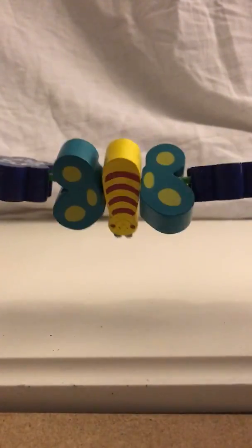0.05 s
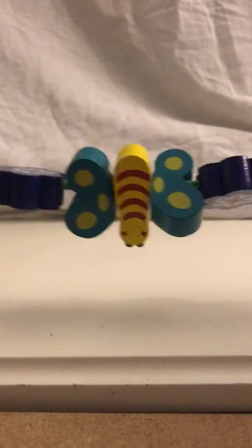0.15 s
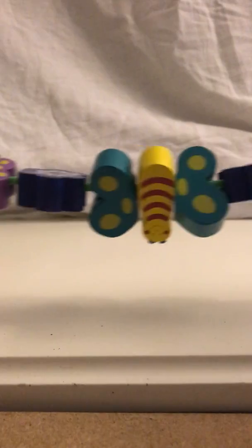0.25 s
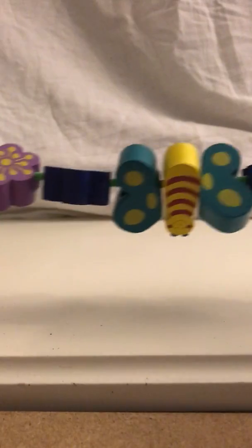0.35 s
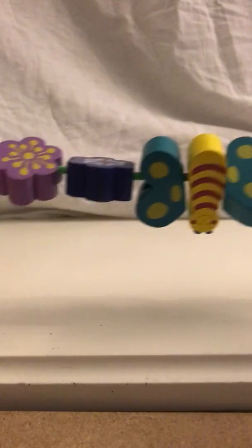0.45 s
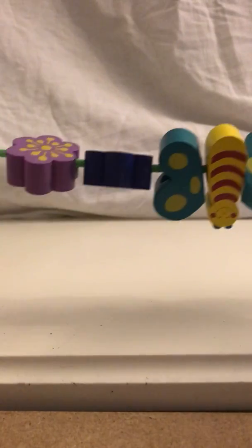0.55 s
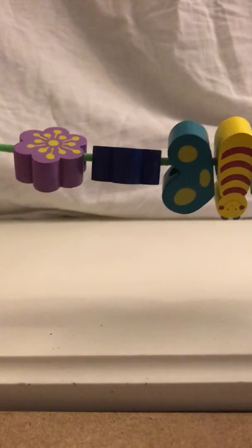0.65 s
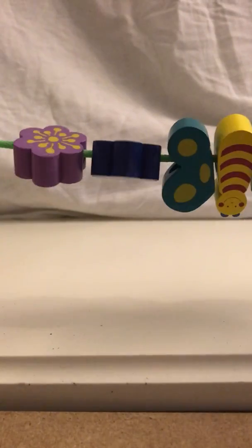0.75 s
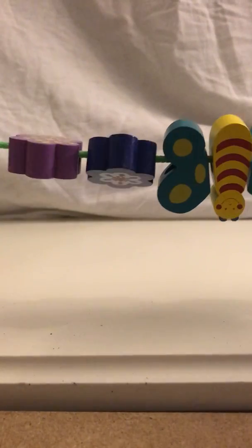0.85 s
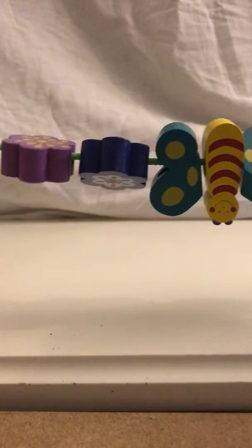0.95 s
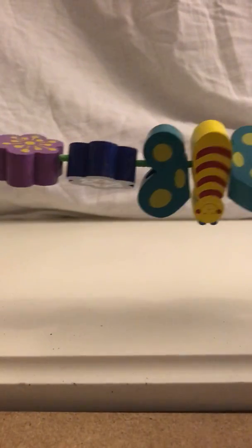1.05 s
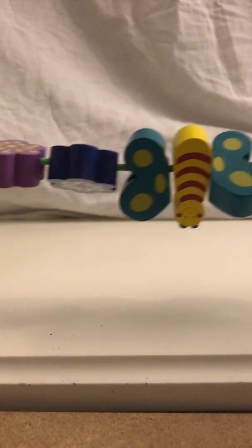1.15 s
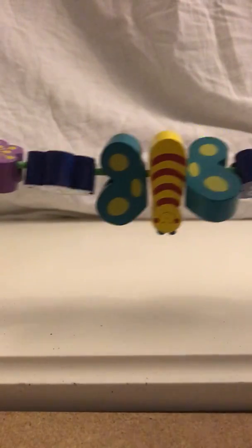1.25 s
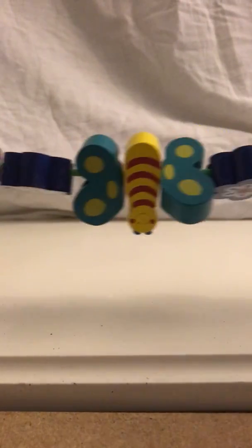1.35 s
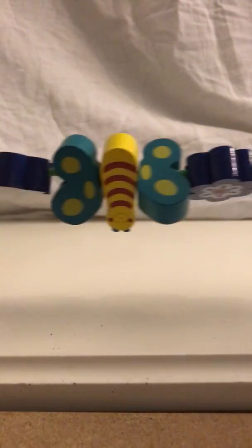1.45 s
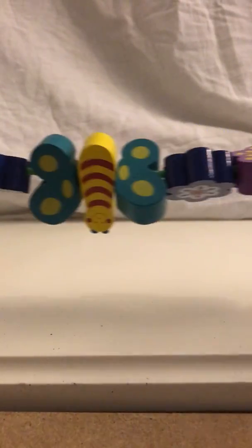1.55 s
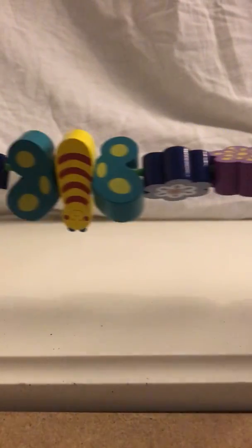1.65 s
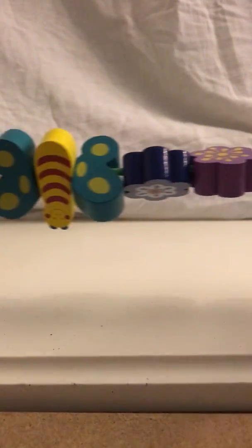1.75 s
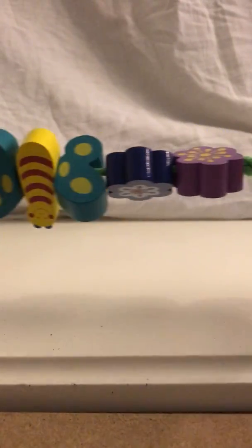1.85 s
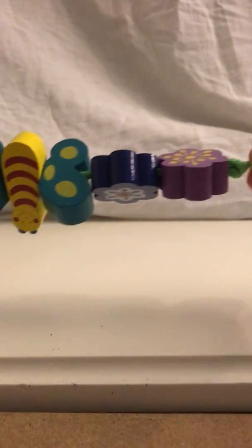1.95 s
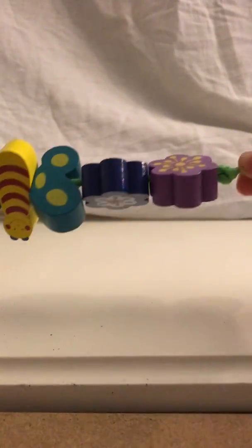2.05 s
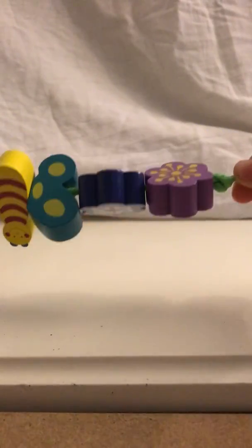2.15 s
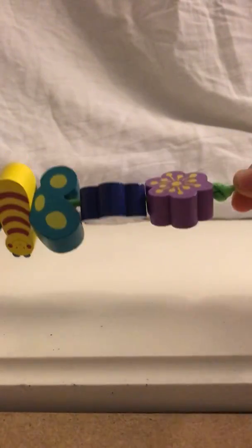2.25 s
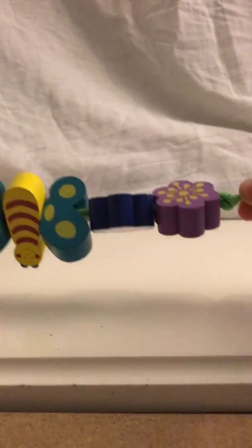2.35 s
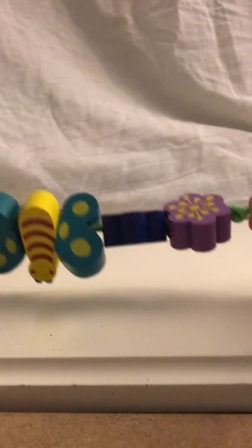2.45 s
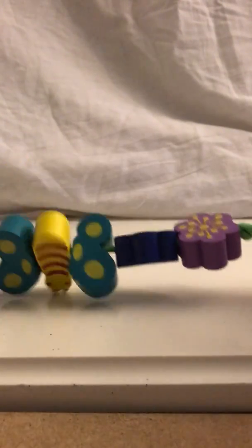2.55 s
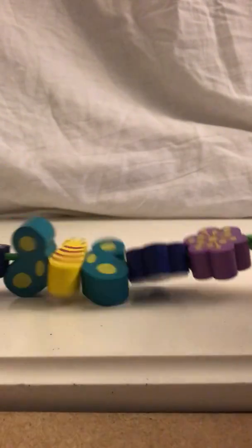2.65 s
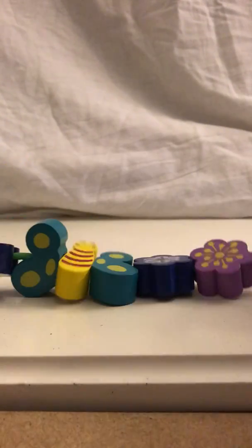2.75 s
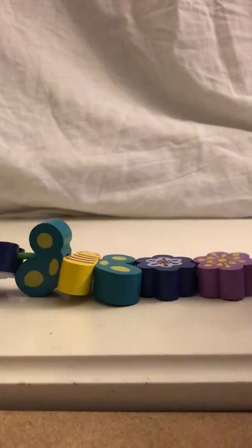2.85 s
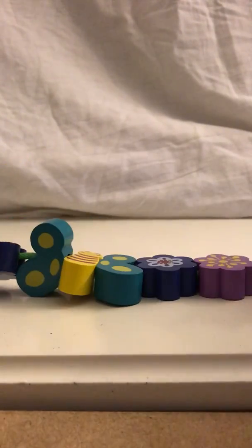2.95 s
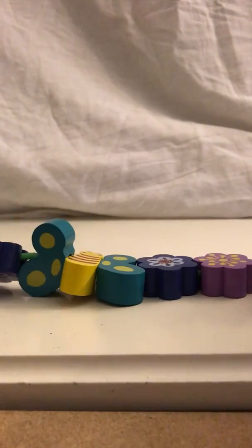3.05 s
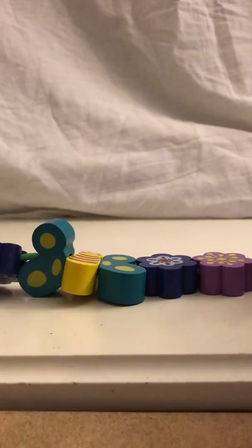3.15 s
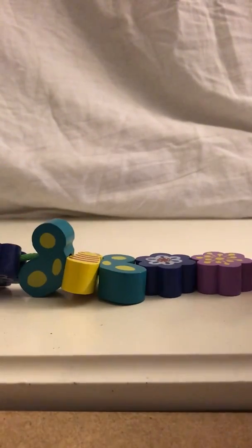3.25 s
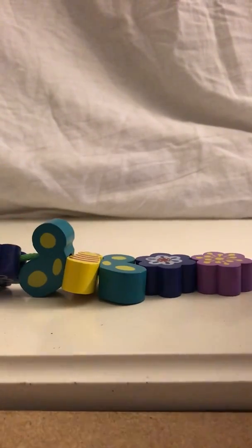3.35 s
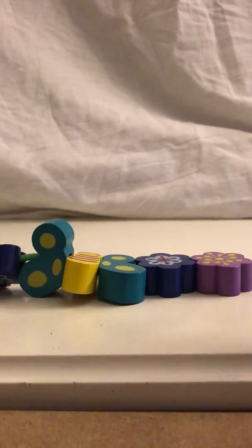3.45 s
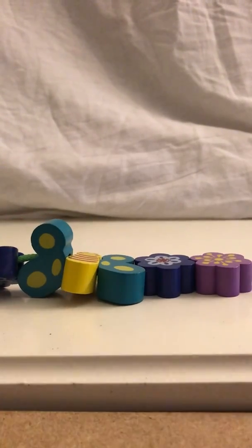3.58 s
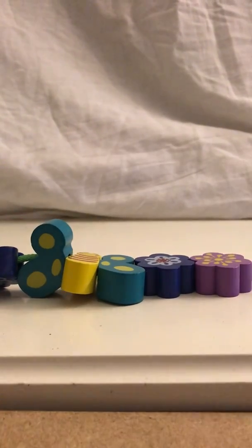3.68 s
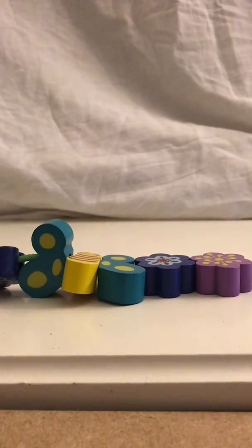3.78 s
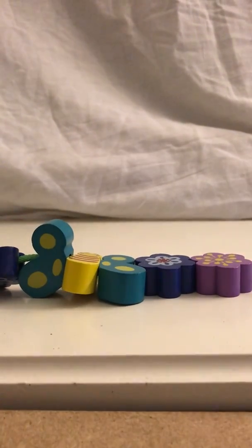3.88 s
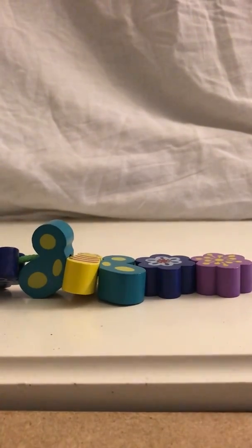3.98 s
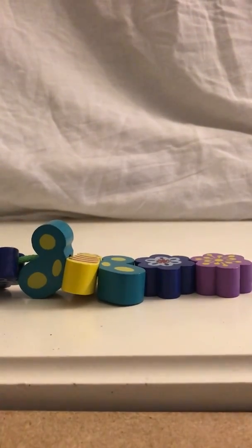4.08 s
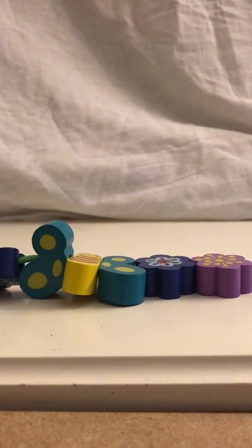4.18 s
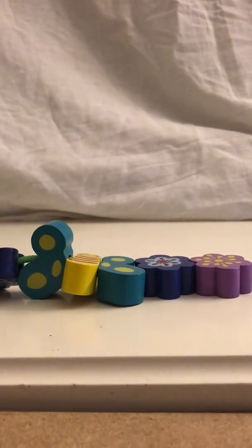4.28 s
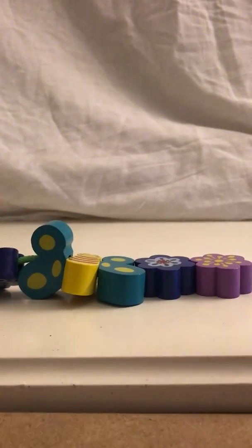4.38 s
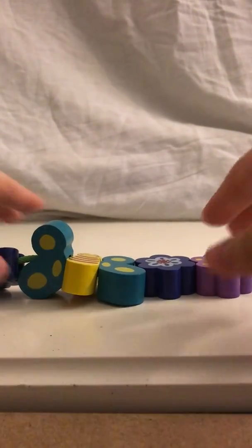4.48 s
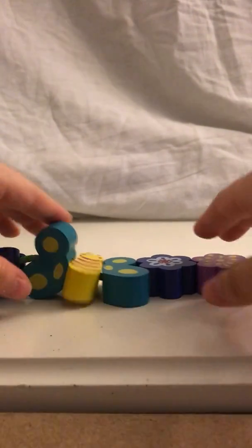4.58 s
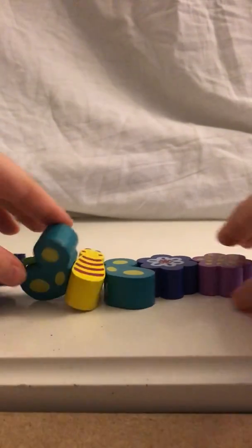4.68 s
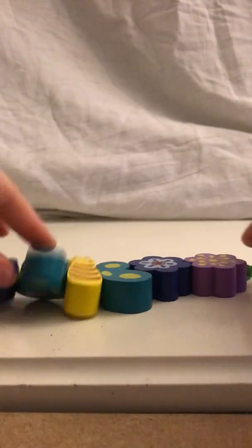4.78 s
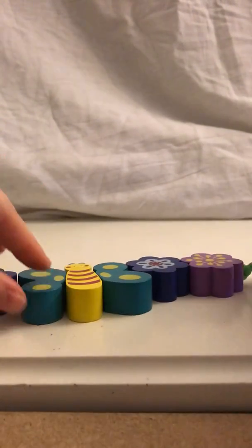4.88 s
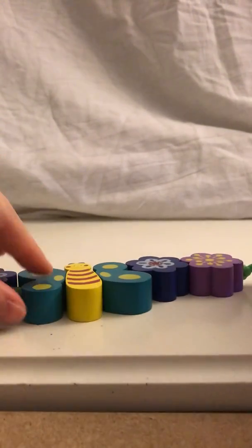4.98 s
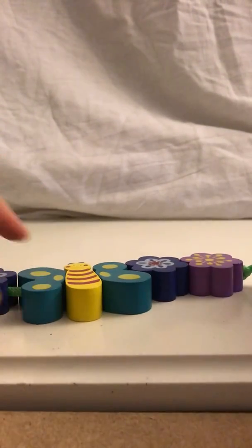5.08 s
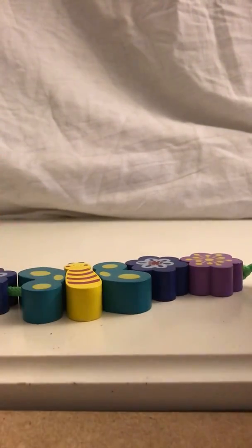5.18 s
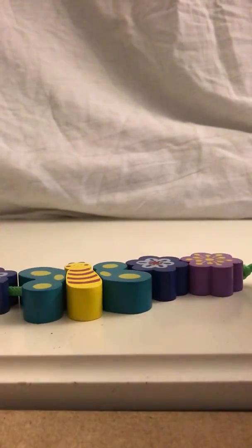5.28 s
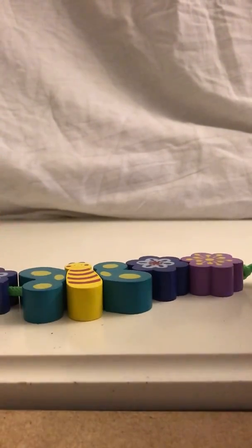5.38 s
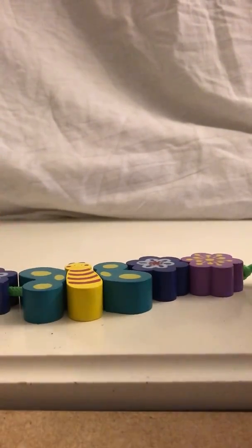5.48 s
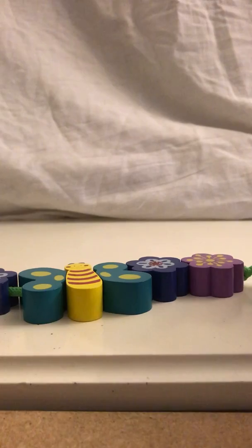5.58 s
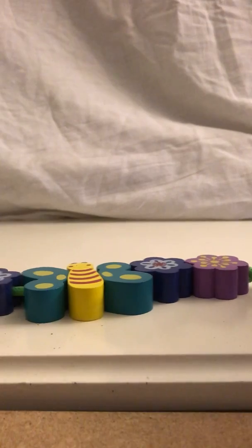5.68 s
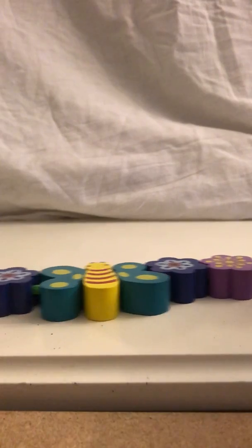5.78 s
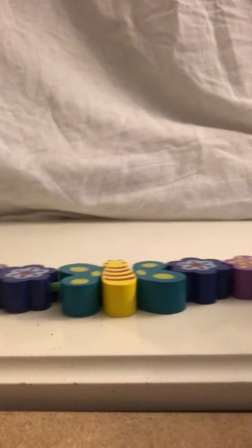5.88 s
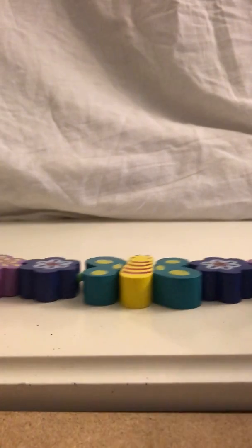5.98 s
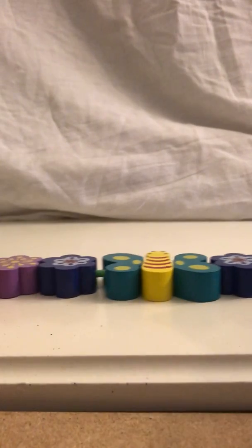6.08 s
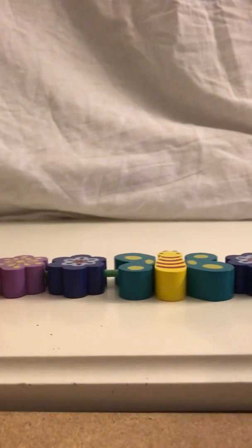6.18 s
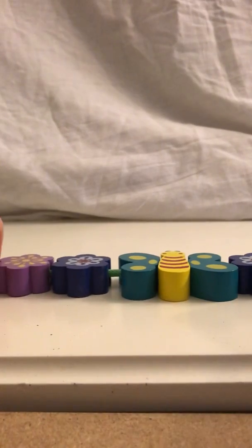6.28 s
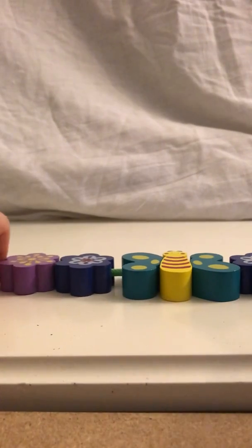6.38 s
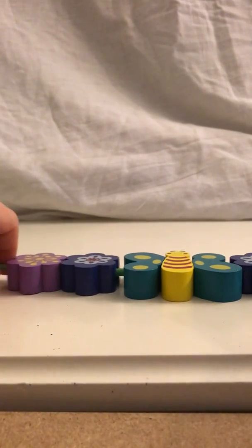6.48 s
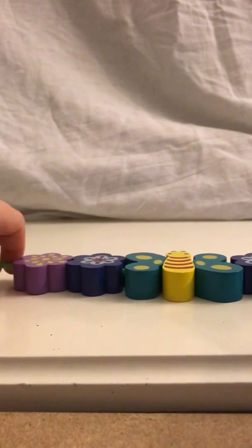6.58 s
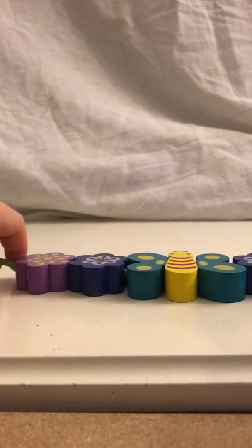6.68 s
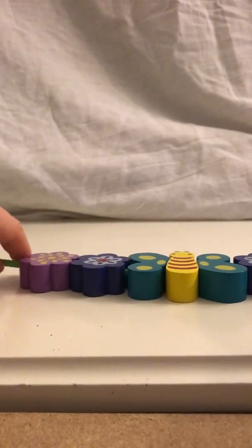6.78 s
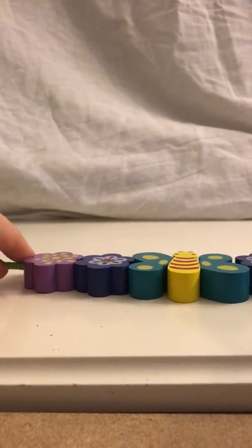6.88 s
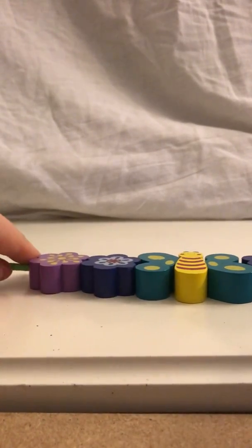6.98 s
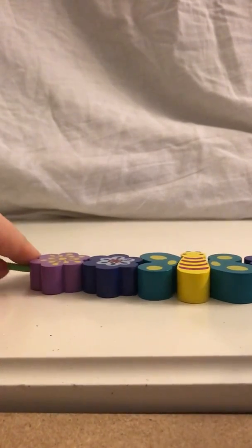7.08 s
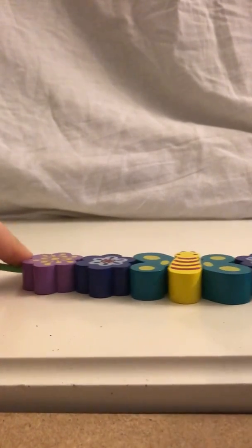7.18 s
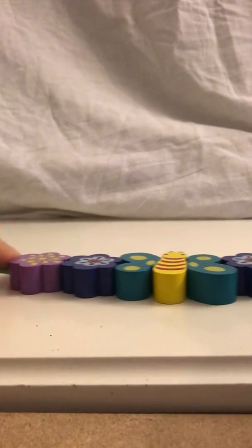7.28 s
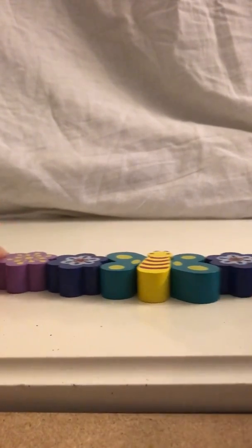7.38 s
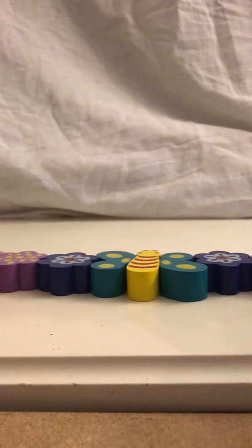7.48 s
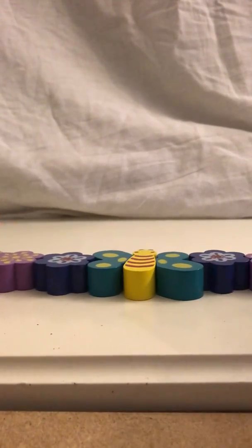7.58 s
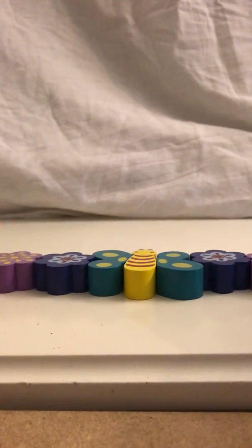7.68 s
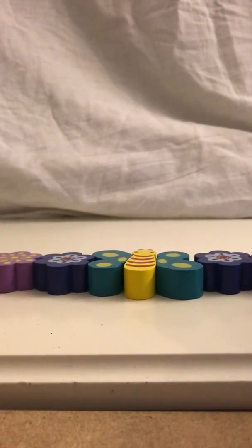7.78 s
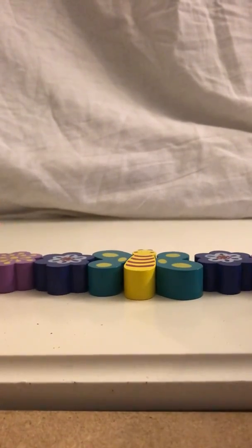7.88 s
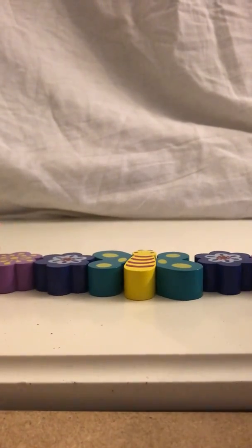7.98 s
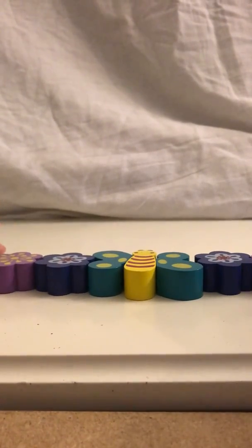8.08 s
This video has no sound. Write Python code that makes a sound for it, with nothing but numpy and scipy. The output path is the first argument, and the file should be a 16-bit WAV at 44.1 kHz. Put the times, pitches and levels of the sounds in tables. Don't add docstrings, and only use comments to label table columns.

```python
import sys
import numpy as np
from scipy import signal
from scipy.fft import rfft, irfft, next_fast_len
from scipy.io import wavfile
from scipy.ndimage import uniform_filter1d, map_coordinates

SR = 44100
rng = np.random.default_rng(int(sys.argv[2]) if len(sys.argv) > 2 else 0)


def decibels_to_gain(level_db):
    exponent = np.asarray(level_db, float) / 20
    return 10 ** exponent


def transcribe(u):
    v = np.clip(np.atleast_2d(u).T, -1, 1)
    q = np.round(v * 32767).astype(np.int16)
    wavfile.write(sys.argv[1], SR, q)


N = 359018
TOP_HZ = 15850
T = np.arange(SR // 2) / SR


def unit(x):
    return x / np.sqrt(np.mean(x ** 2) + 1e-20)


def along(points, hz):
    f, value = np.transpose(points)
    return np.interp(np.log(hz + 1), np.log(f + 1), value)


def curves(rows, silent=None):
    s, *columns = np.transpose(rows)
    t = np.arange(N) / SR
    return [np.interp(t, s, column, silent, silent) for column in columns]


def wobble(rate):
    knots = rng.standard_normal(int(N * rate / SR) + 4)
    return map_coordinates(knots, [np.arange(N) * rate / SR])


def noise(spectrum, grit_db, rate):
    m = next_fast_len(N + 8192)
    hz = np.fft.rfftfreq(m, 1 / SR)
    gritty = rng.standard_normal(N) * decibels_to_gain(grit_db * wobble(rate))
    colour = decibels_to_gain(along(spectrum, hz)) * (hz < TOP_HZ)
    return unit(irfft(rfft(gritty, m) * colour, m)[:N])


def ring(modes, rise, pitch=1, scatter_db=1.0, detune=0.027):
    hz, db, t60 = np.transpose(modes)[:, :, None]
    strength, shift = rng.standard_normal((2, len(modes), 1))
    t = T[:round(1.5 * t60.max() * SR)]
    decay = decibels_to_gain(db + scatter_db * strength - 60 * t / t60)
    waves = decay * np.sin(2 * np.pi * hz * pitch * (1 + detune * shift) * t)
    x = waves.sum(0) * (1 - np.exp(-t / rise))
    x = np.pad(x, (0, len(T) - len(t)))
    return x / np.abs(x).max()


def crack(lo_hz, hi_hz, t60, order=2):
    band = signal.butter(order, [lo_hz, min(hi_hz, SR / 2.2)], "bandpass", fs=SR, output="sos")
    t = T[:SR // 10]
    push = .45 * rng.standard_normal(len(t)) * decibels_to_gain(-60 * t / t60)
    push[0] = np.sqrt(SR / (hi_hz - lo_hz)) / 2
    x = np.pad(signal.sosfilt(band, push), (0, len(T) - len(t)))
    return x / np.abs(x).max()


# (f/Hz, t60/s)
ROOM_T60 = [(200, 0.68), (1500, 0.33), (5000, 0.24), (12000, 0.17)]
# (f/Hz, level/dB)
ROOM_COLOUR = [(200, -5), (1500, 1), (7000, -0.5), (9000, -4.5), (16000, -6.5)]


def room(x, wet_db):
    hz, t, z = signal.stft(rng.standard_normal(len(T)), SR, nperseg=256)
    decay_db = along(ROOM_COLOUR, hz)[:, None] - 60 * t / along(ROOM_T60, hz)[:, None]
    z = z * (hz < TOP_HZ)[:, None] * decibels_to_gain(decay_db)
    tail = signal.istft(z, SR, nperseg=256)[1][:len(T)]
    tail = tail * (1 - np.exp(-T / .003))
    colour = np.sqrt(np.abs(uniform_filter1d(np.abs(rfft(x)) ** 2, size=1200)))
    return x + decibels_to_gain(wet_db) * irfft(rfft(tail / np.linalg.norm(tail)) * colour, len(T))


def add(track, s, x):
    track[round(s * SR):][:len(x)] += x


# (t/s, level/dB)
RUMBLE_LEVEL = [(0, -62), (.68, -64), (1.68, -61.5), (2.6, -60), (2.67, -41.5), (2.81, -55.5),
                (3.35, -48.5), (3.74, -52), (4.3, -56), (4.87, -55.5), (5.05, -57.5), (5.5, -56.5),
                (6.12, -54), (7.09, -57), (7.8, -53.5), (8.14, -62)]
# (f/Hz, level/dB per Hz)
RUMBLE_SPECTRUM = [(12, -47.5), (20, -18), (31, -3.5), (48, -1.5), (97, -5.5), (135, -4.5), (179, -11),
                   (218, -2.5), (255, -8), (340, -9.5), (471, -21.5), (513, -31), (600, -22.5),
                   (780, -54.5), (1320, -120)]
# (t/s, f/Hz, level/dB)
DRONE_PATH = [(0, 68.1, -62.5), (.63, 67.7, -59), (.77, 64.1, -73), (1.43, 63.25, -65.5), (2.4, 68.2, -73),
              (2.7, 79.6, -69), (2.86, 73.3, -62), (2.95, 68.1, -55.5), (4.05, 61, -59.5),
              (4.5, 59.85, -61.5), (4.97, 72, -49), (5.17, 72, -67.5), (5.9, 60.17, -63.5),
              (6.76, 68.9, -59.5), (7.07, 76.5, -63.5), (7.46, 70, -74.5), (7.62, 70.2, -56),
              (8.14, 67.8, -57)]
# (f/Hz, level/dB per Hz)
HISS_SPECTRUM = [(200, -39.5), (400, -2), (550, -4.5), (900, -5.5), (1700, -6.5), (2200, -15.5),
                 (3000, -14), (4800, -20), (7500, -23), (9000, -22), (10500, -26), (12500, -20.5),
                 (15000, -24.5), (15750, -25)]
# (t/s, level/dB)
HISS_DRIFT = [(0, 0), (2.6, 0), (2.9, 2.5), (4.2, .5), (4.9, 2), (5.6, 0.6), (6.1, 2), (8.14, 1)]
# (t/s, level/dB)
LIFT_LEVEL = [
    (4.95, -49),
    (5.1, -61),
    (5.2, -66.5),
    (5.37, -67.5),
    (5.39, -93.5),
]
# (f/Hz, level/dB per Hz)
LIFT_SPECTRUM = [(500, -120), (1200, 4), (3000, 5), (8000, 0), (15700, -9), (15950, -120)]


def house():
    rumble_db, = curves(RUMBLE_LEVEL)
    rumble = decibels_to_gain(rumble_db - 2.33) * noise(RUMBLE_SPECTRUM, grit_db=1.5, rate=6)
    hz, drone_db = curves(DRONE_PATH)
    phase = 2 * np.pi * np.cumsum(hz + 1.6 * wobble(6.0)) / SR
    drone = np.sqrt(2) * decibels_to_gain(drone_db + 0.45 * wobble(5.9)) * np.sin(phase)
    drift_db, = curves(HISS_DRIFT)
    hiss = decibels_to_gain(drift_db - 70) * noise(HISS_SPECTRUM, grit_db=.3, rate=40)
    lift_db, = curves(LIFT_LEVEL, -120)
    lift = decibels_to_gain(lift_db) * noise(LIFT_SPECTRUM, grit_db=0.43, rate=49)
    return rumble + drone + hiss + lift


def strokes(rows):
    fade_db = 23
    t = np.arange(N) / SR
    gain = np.zeros(N)
    for s, push, hold, run_out, db in rows:
        corners = np.cumsum([s, push, hold, run_out])
        gain += decibels_to_gain(np.interp(t, corners, [db - fade_db, db, db, db - fade_db], -120, -120))
    return gain


# (start t/s, push t/s, hold t/s, run-out t/s, level/dB)
DRAGS = [(3.1, 0.037, 0.022, 0.07, -63.5), (3.2, 0.037, 0.017, 0.012, -58.5),
         (3.43, 0.012, 0.0098, 0.044, -57.5), (4.66, 0.023, 0.018, 0.086, -58),
         (4.86, 0.065, 0.0074, 0.0068, -48.5), (5.42, 0.14, 0.034, 0.031, -63),
         (5.76, 0.012, 0.0082, 0.034, -57), (5.8, 0.043, .16, 0.026, -58.5), (6, 0.026, 0.14, 0.2, -53.5),
         (6.4, 0.032, 0.095, 0.082, -69), (6.55, 0.052, .02, 0.23, -65), (6.83, .03, 0.019, 0.13, -68.5),
         (7.08, 0.041, 0.049, .06, -77), (7.17, 0.11, 0.26, 0.22, -62.5),
         (7.68, 0.021, 0.018, 0.049, -78.5)]
# (f/Hz, level/dB per Hz)
SCRAPE_SPECTRUM = [(150, -27), (250, -9), (359, 6), (488, 3), (853, 1.5), (1050, -4), (1180, 2.5),
                   (1400, -7.5), (1700, -1), (1860, -9.5), (2030, -4), (2300, -13), (3200, -24),
                   (7000, -34.5), (9100, -70), (15400, -120)]
# (start t/s, push t/s, hold t/s, run-out t/s, level/dB)
RUBS = [
    (.02, 0.024, .02, .04, -73),
    (2.69, .01, .03, .06, -63),
    (2.78, .01, .12, .08, -57),
    (3.23, .008, .015, .01, -66),
    (3.27, .01, 0.052, 0.13, -62),
    (3.65, .008, 0.019, .03, -63),
]
# (f/Hz, level/dB per Hz)
GRIND_SPECTRUM = [(1500, -60), (2200, -2), (3300, 0), (4400, -7), (6500, -22), (12000, -60)]
# (start t/s, push t/s, hold t/s, run-out t/s, level/dB)
RUSTLES = [(2.62, 0.026, 0.11, 0.065, -74), (2.77, 0.028, 0.084, .06, -77), (5.72, 0.077, 0.053, 0.23, -74),
           (5.9, 0.13, 0.086, 0.22, -73), (6.42, 0.14, 0.07, 0.059, -73.5), (6.71, 0.021, .01, 0.035, -74),
           (6.76, 0.13, 0.0047, 0.052, -81), (7.05, 0.13, .01, 0.13, -80), (7.29, 0.013, .02, 0.22, -70.5),
           (7.51, 0.017, .01, 0.048, -73), (7.57, 0.024, .005, .02, -71), (7.66, 0.087, 0.042, .1, -71.5),
           (7.9, 0.081, .01, 0.08, -84.5)]
# (f/Hz, level/dB per Hz)
SKIN_SPECTRUM = [(2500, -120), (3500, -3.5), (7000, -9), (10500, -8), (14500, 0.5), (15800, -2)]


def friction():
    firm_db, grind_db, grind_growth = -52, -12, 1.6
    drag = strokes(DRAGS) * decibels_to_gain(.8 * wobble(40))
    scrape = drag * noise(SCRAPE_SPECTRUM, grit_db=2.2, rate=500)
    pressed = decibels_to_gain(firm_db + grind_db) * (drag / decibels_to_gain(firm_db)) ** grind_growth
    grind = (pressed + strokes(RUBS)) * noise(GRIND_SPECTRUM, grit_db=3, rate=300)
    rustle = strokes(RUSTLES) * noise(SKIN_SPECTRUM, grit_db=3.5, rate=330)
    return scrape + grind + rustle


# (t/s, peak level/dB, brightness level/dB)
TAP_EVENTS = [(0.0511, -59, -4), (0.27, -62, 9), (0.38, -53, -10), (3.1524, -69, -4), (3.1692, -58, 6),
              (3.5524, -57, -18), (4.686, -46, 2), (5.6914, -64, -8.5), (5.8444, -58, -3),
              (5.8694, -58.5, 6), (6.0664, -52, -12), (6.1562, -59, -26.5), (6.4017, -43, -21.5),
              (6.4516, -44, -23), (6.4802, -43.5, -28), (6.501, -45.5, -22), (6.5141, -46, -22),
              (6.5997, -57, -14), (6.994, -57, 3), (7.1624, -60.5, -7), (7.1894, -41, -4), (7.232, -54, 2),
              (7.5634, -56, -4), (7.7348, -56, 10), (7.7694, -59, -9)]
# (t/s, peak level/dB, brightness level/dB)
CORD_TICKS = [(6.5874, -60, -11.5), (6.6124, -55, -13), (6.6298, -45, -8), (6.6384, -54, 3),
              (6.6497, -48, -24.5), (6.7053, -55, -18), (6.659, -58, -15), (6.7283, -47, -10),
              (6.7362, -53, 7), (6.7386, -44.5, -19), (6.78, -58, 2), (6.7544, -51, -20),
              (6.7667, -54.5, -17), (6.8279, -52, 5), (6.848, -50, -2), (6.8977, -51, 11),
              (7.122, -50.5, -5), (7.1507, -43, -3), (7.219, -52, -12), (7.3005, -52, 3), (7.3053, -51, -1),
              (7.3174, -48, -14), (7.3655, -46, 3), (7.4011, -52, 1), (7.5168, -51, -7), (7.525, -55, -2),
              (7.328, -63, 1), (7.352, -61, -10), (7.755, -67, 11), (7.777, -62, 11), (7.79, -60.5, 7),
              (7.596, -49, 2), (7.8274, -61, 12)]
# (t/s, peak level/dB, brightness level/dB)
NAIL_FLICK = [
    (5.5889, -52, -4),
]


def ticks():
    track = np.zeros(N + SR)
    kinds = (TAP_EVENTS, -5.5, .036), (CORD_TICKS, -32, .036), (NAIL_FLICK, 20, .0015)
    for rows, body_db, body_s in kinds:
        for s, db, top_db in rows:
            click = crack(3100, 7200, 0.0056)
            top = decibels_to_gain(top_db) * crack(9900, 17800, 0.0059)
            body = decibels_to_gain(body_db) * crack(950, 3700, body_s)
            add(track, s, decibels_to_gain(db) * room(click + top + body, wet_db=-14.0))
    return track[:N]


# (t/s, f/Hz, peak level/dB, t60/s)
SHORT_NOTES = [(2.633, 8100, -57, .008), (2.6588, 9300, -57, .006), (2.681, 6300, -58, .008),
               (2.699, 5500, -46, 0.0094), (2.7965, 10100, -61, .01), (2.8004, 8340, -52, 0.011),
               (2.8005, 2070, -34, 0.038), (2.866, 2080, -40, 0.029), (2.6995, 2030, -34.5, 0.034),
               (2.7835, 2670, -47, .015), (2.811, 5900, -60, 0.022), (2.866, 7400, -63, .006),
               (2.867, 10860, -66, .01), (2.877, 7300, -64, .006), (3.2665, 1750, -26.5, 0.018),
               (3.2667, 3070, -36, .012), (3.2667, 5020, -27, 0.015), (3.2668, 10800, -33, 0.0056),
               (3.2668, 6070, -32, 0.015), (3.658, 2030, -55, 0.046), (3.668, 1900, -50.5, 0.058),
               (4.672, 3200, -62, 0.0093), (4.6815, 2780, -59, 0.0097), (4.682, 8200, -72, .008),
               (4.9106, 12170, -33, 0.0079), (4.9106, 3730, -22.5, .01), (4.9112, 6245, -40.5, 0.011),
               (4.916, 1960, -29, .015), (4.9289, 14200, -22.5, .004), (4.9331, 7400, -17.5, .016),
               (4.9333, 12070, -24, .006), (4.9435, 7380, -24, 0.022), (4.955, 13800, -40.5, 0.0088),
               (4.9709, 8500, -21, 0.017), (4.9718, 1714, -27, 0.028), (4.971, 14450, -27.5, 0.0054),
               (5.5892, 2000, -44, 0.0063), (5.5891, 3900, -44.5, 0.006), (5.593, 3940, -54.5, 0.013),
               (5.77, 1815, -52, 0.027), (5.78, 5780, -58, 0.036), (5.846, 2030, -58, 0.051),
               (5.944, 2030, -54.5, 0.029), (6.021, 1990, -45, 0.052), (7.698, 2060, -58.5, 0.031)]


def pings():
    track = np.zeros(N + SR)
    for s, hz, db, t60 in SHORT_NOTES:
        add(track, s, decibels_to_gain(db) * ring([(hz, 0, t60)], 0.00035, detune=0))
    return track[:N]


# (t/s, shelf level/dB, clack level/dB, edge level/dB, bead f/Hz)
LANDINGS = [(2.6328, -22.5, -52.5, -42, 3800), (2.6587, -25, -54, -47, 4100), (2.6804, -21, -65, -50, 3970),
            (2.6989, -27, -40, -44, 4000), (2.71, -32, -42, -61, 2960), (2.722, -26.5, -66, -51, 3480),
            (2.743, -34, -61, -68, 3940), (2.782, -28.5, -48, -72, 2650), (2.8, -28, -43.5, -58, 3200),
            (2.809, -32, -52, -59, 3240), (2.8351, -38, -44, -57, 4000), (2.845, -32, -62, -71, 2900),
            (2.8652, -37.5, -65, -56, 4000), (2.877, -38, -57, -70, 3100), (2.8851, -38, -50, -64, 3770),
            (2.898, -41, -64, -67, 3500)]
# (t/s, shelf level/dB, clack level/dB)
NUDGED = [(3.093, -41.5, -89), (3.114, -42.5, -90), (3.132, -43, -80), (3.373, -40, -68),
          (3.656, -41.5, -68), (4.6817, -44, -58), (4.748, -50.5, -72), (5.769, -45.5, -63),
          (5.946, -54, -76), (6.019, -41.5, -62), (6.6, -50, -66), (7.219, -49, -57), (7.399, -51, -72),
          (7.695, -60, -73)]
# (t/s, shelf level/dB, clack level/dB, bead f/Hz, thump level/dB)
TUMBLES = [(3.2667, -23.5, -19.5, 5630, -30.5), (3.277, -30, -55, 5970, -56), (3.2947, -33, -37, 5600, -43),
           (4.9110, -24.5, -20, 3230, -37.5), (4.9231, -34, -36.5, 3000, -48.5),
           (4.9285, -22, -10, 5600, -40), (4.9319, -30, -20.5, 3740, -41), (4.9327, -20, -9.5, 6400, -31.5),
           (4.934, -27, -14, 3660, -40.5), (4.9442, -36, -28.5, 5279, -44.5),
           (4.9446, -34.5, -23.5, 3740, -47), (4.9685, -35, -25, 3990, -51.5),
           (4.9696, -41.5, -25.5, 3086, -43.5), (4.971, -27.5, -18.5, 6400, -39),
           (5.778, -48, -51, 2270, -56)]


def contacts():
    rows = []
    for s, shelf, clack, edge, hz in LANDINGS:
        rows.append((s, shelf, clack, edge, shelf - 12, hz))
    for s, shelf, clack in NUDGED:
        small_bead_hz = 3640 * (1 + 0.04 * rng.standard_normal())
        rows.append((s, shelf, clack, clack - 16, shelf - 6.5, small_bead_hz))
    for s, shelf, clack, hz, thump in TUMBLES:
        rows.append((s, shelf, clack, clack - 9, thump, hz))
    return rows


# (f/Hz, level/dB, t60/s)
SHELF_MODES = [(652, -6, 0.019), (790, 2, 0.014), (982, -7.5, 0.056), (1190, 1, 0.033), (1526, -4.5, 0.032),
               (1750, -5.5, 0.028), (2030, -7, 0.041), (2600, -15, 0.0076), (3200, -12.5, .012)]


def shelf_knock(shelf_db, bead_db):
    crisp = np.clip((bead_db - shelf_db + 40) / 30, 0, 1)
    soft = signal.butter(N=3, Wn=2100 * (1 + .7 * crisp), fs=SR, output="sos")
    tone = ring(SHELF_MODES, rise=.0003, scatter_db=2.5, detune=.02)
    blur = .4 * crack(450, 3600, .03)
    return decibels_to_gain(shelf_db) * signal.sosfilt(soft, tone + blur)


# (ratio to pitch, level/dB, t60/s)
BEAD_MODES = [(1, 0, .009), (.8, -12, .006), (1.52, -14, .007), (2.12, -20, .007)]


def bead_clack(bead_db, hz):
    hard = np.clip((bead_db + 45) / 25, 0, 1)
    tone = (1.7 - 1.4 * hard) * ring(BEAD_MODES, .0002, hz, scatter_db=1.5, detune=.01)
    lo_hz, hi_hz = (.8 - .25 * hard) * hz, (1.25 + .2 * hard) * hz
    bead = tone + (.5 + .5 * hard) * crack(lo_hz, hi_hz, .0045, order=4)
    return decibels_to_gain(bead_db + 5) * bead / np.abs(bead).max()


# (f/Hz, level/dB, t60/s)
BENDING_MODES = [(94.5, -3, 0.33), (125, -2, 0.27), (199.4, 1, 0.24), (361, -1.5, 0.06), (453, -5.5, 0.11)]
# (f/Hz, level/dB, t60/s)
DRUM_MODES = [(405, 1.5, 0.048), (320, -6.5, 0.11)]


def knocks():
    track = np.zeros(N + SR)
    for s, shelf_db, bead_db, edge_db, thump_db, hz in contacts():
        edge = decibels_to_gain(edge_db) * crack(9300, 15800, .004)
        hit = shelf_knock(shelf_db, bead_db) + bead_clack(bead_db, hz) + edge
        thump = decibels_to_gain(thump_db - 1.0) * ring(BENDING_MODES, 0.0018)
        add(track, s, room(hit, wet_db=-11.0) + thump)
    flat_fall = decibels_to_gain(-27.5) * ring(DRUM_MODES, 0.0019, scatter_db=0.5, detune=0)
    add(track, 3.2668, flat_fall)
    return track[:N]


def scene():
    return (house() + friction() + ticks() + pings() + knocks())[None]


def top_cut(x):
    return signal.sosfilt(signal.butter(12, 16830, fs=SR, output="sos"), x)


def record(dry):
    limit = signal.butter(12, 16300, fs=SR, output="sos")
    mix = signal.sosfiltfilt(limit, dry)
    return top_cut(mix)


dry = scene()
out = record(dry)
transcribe(out)
```